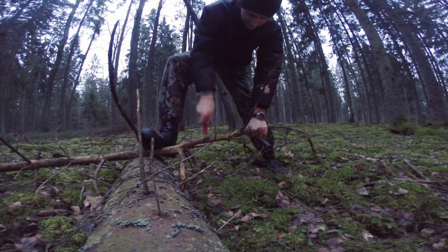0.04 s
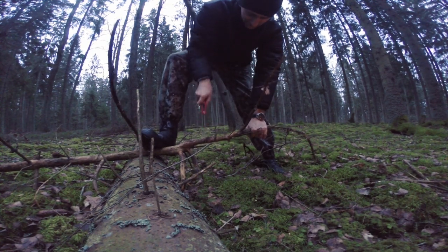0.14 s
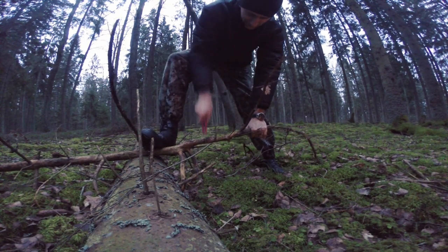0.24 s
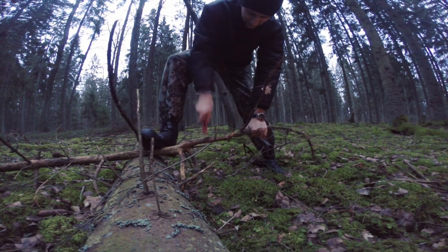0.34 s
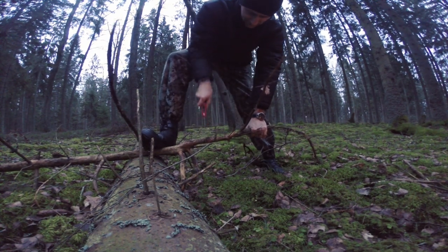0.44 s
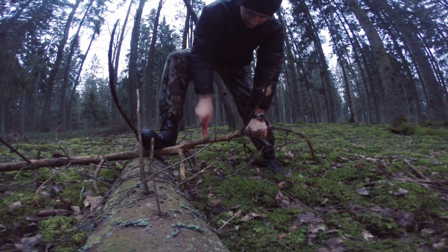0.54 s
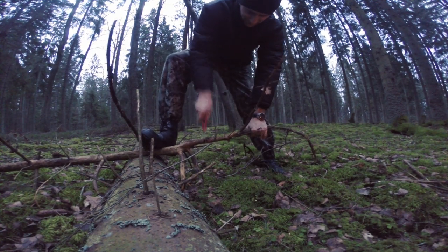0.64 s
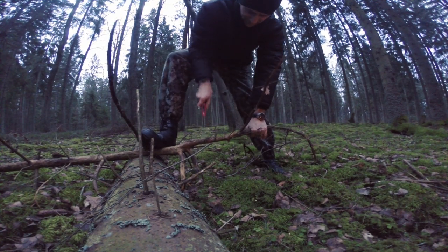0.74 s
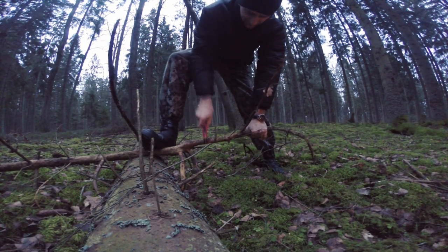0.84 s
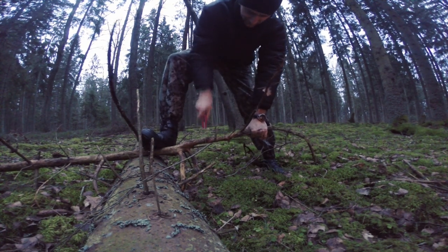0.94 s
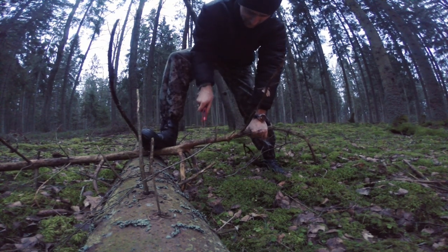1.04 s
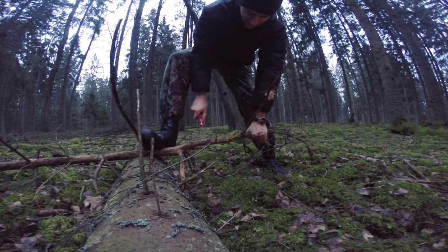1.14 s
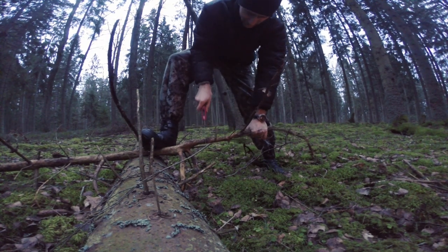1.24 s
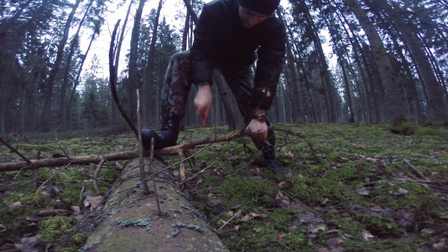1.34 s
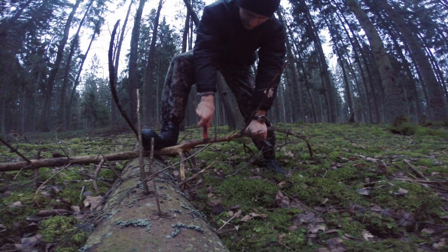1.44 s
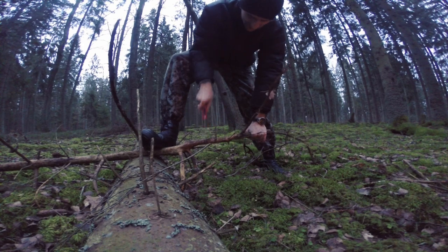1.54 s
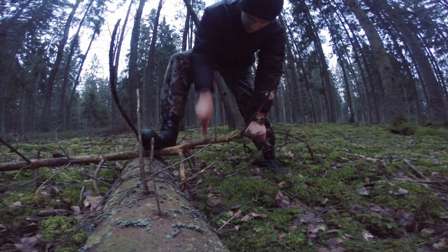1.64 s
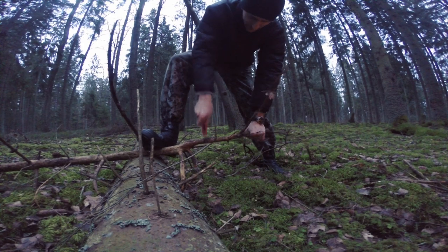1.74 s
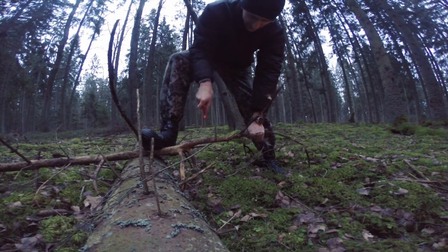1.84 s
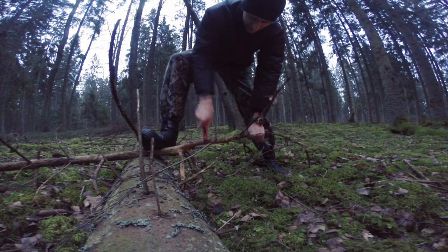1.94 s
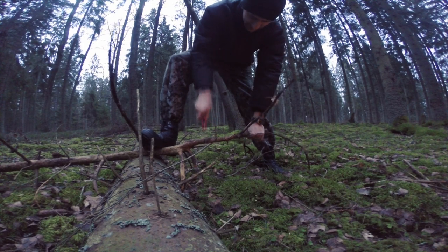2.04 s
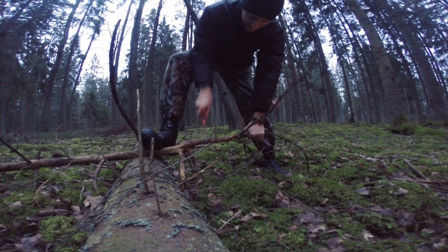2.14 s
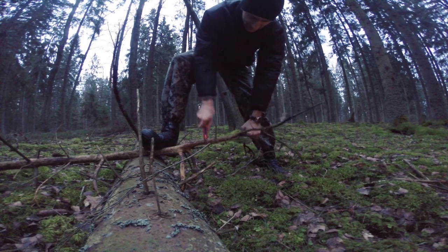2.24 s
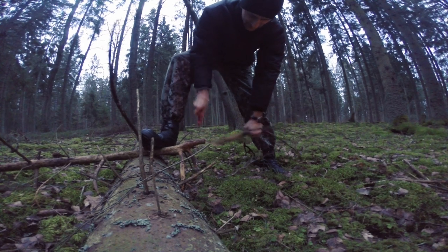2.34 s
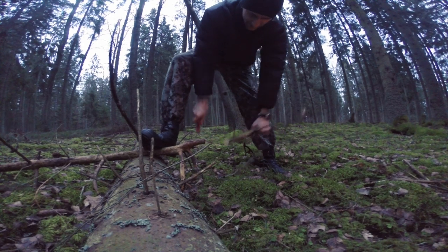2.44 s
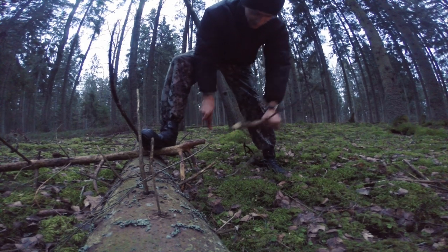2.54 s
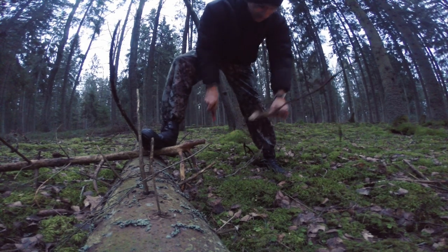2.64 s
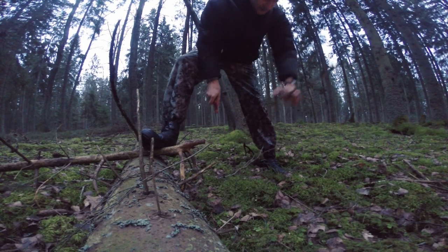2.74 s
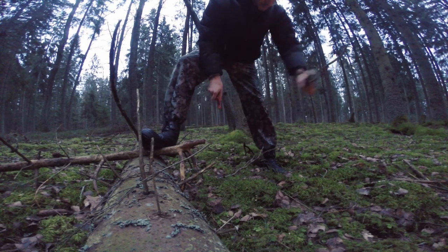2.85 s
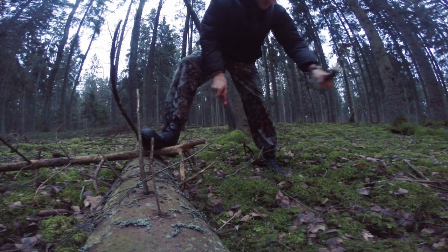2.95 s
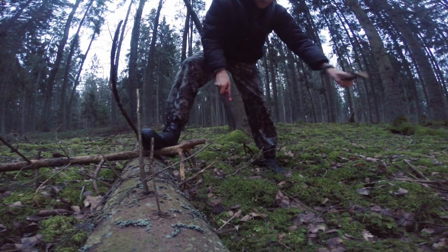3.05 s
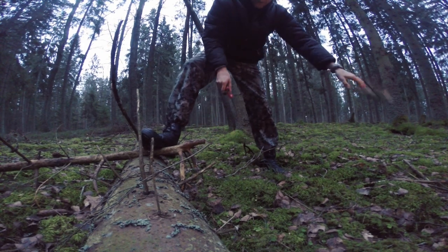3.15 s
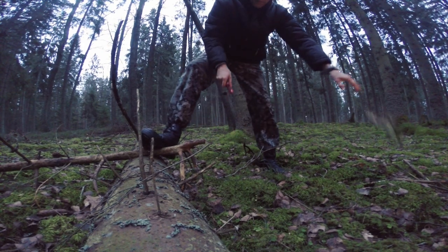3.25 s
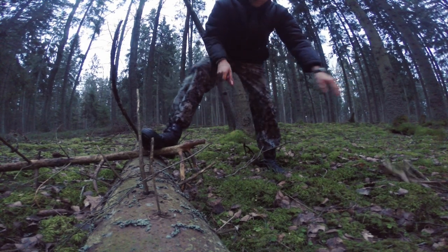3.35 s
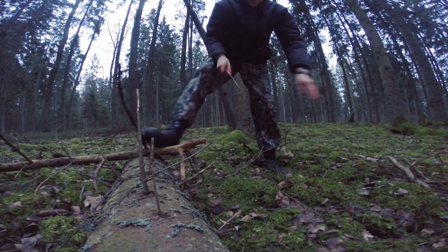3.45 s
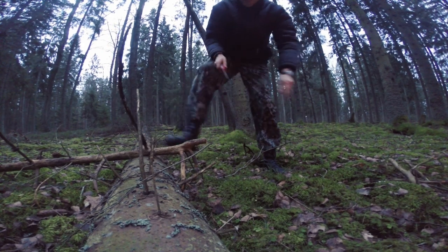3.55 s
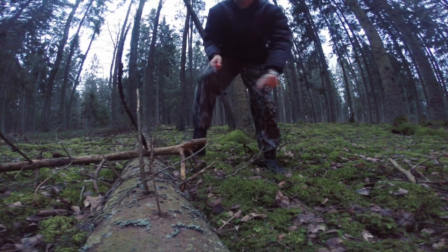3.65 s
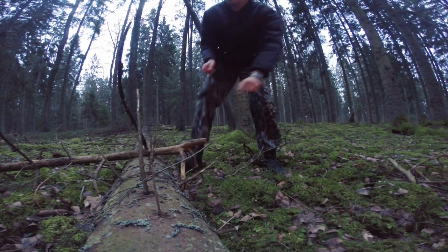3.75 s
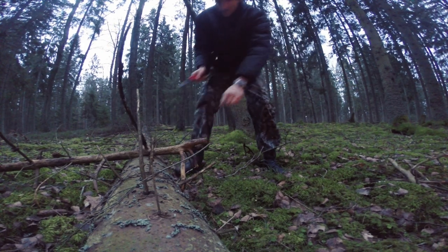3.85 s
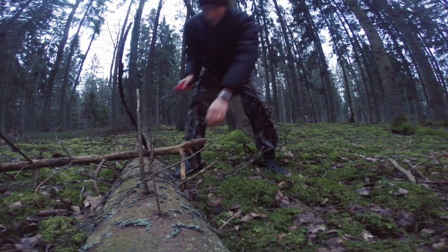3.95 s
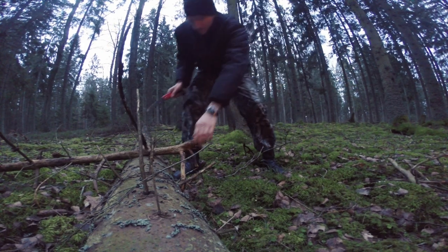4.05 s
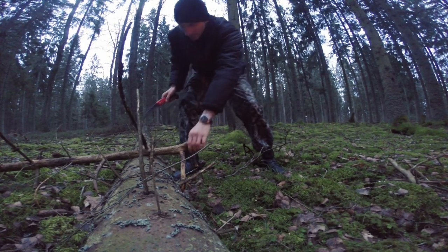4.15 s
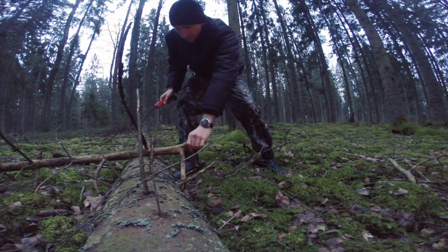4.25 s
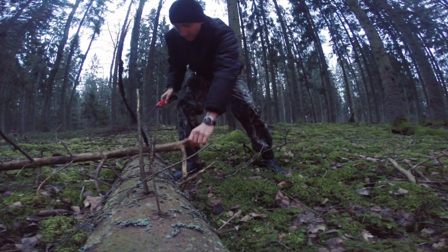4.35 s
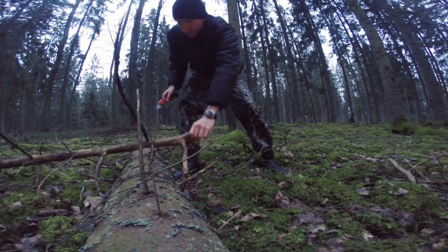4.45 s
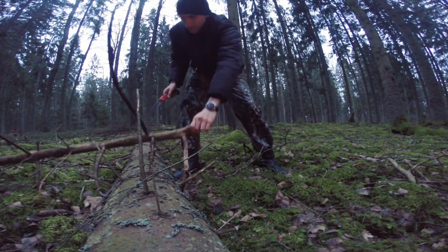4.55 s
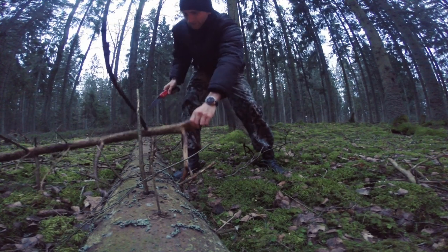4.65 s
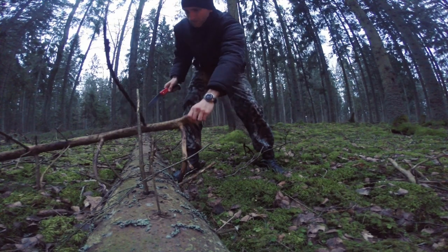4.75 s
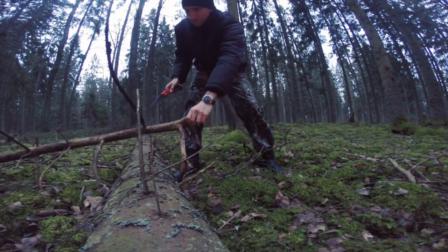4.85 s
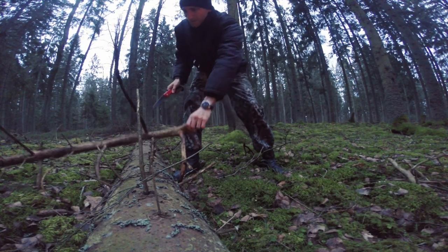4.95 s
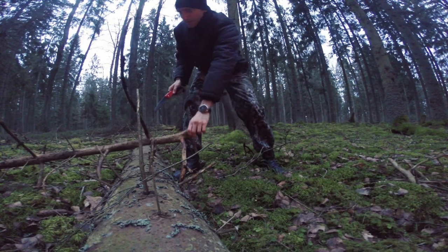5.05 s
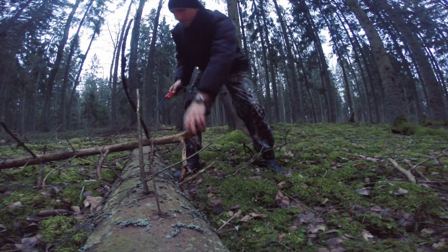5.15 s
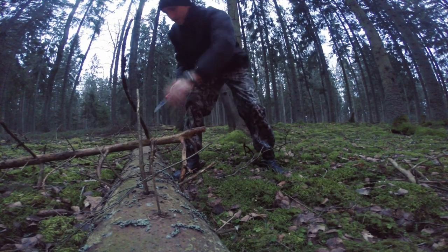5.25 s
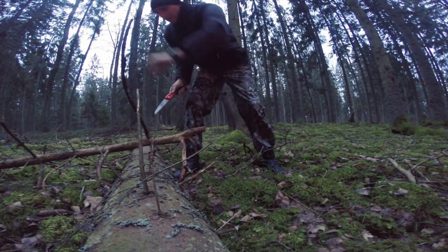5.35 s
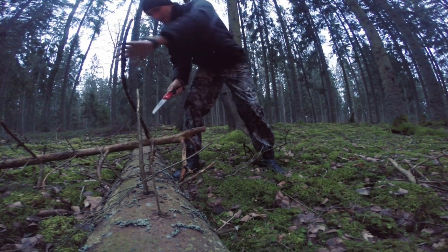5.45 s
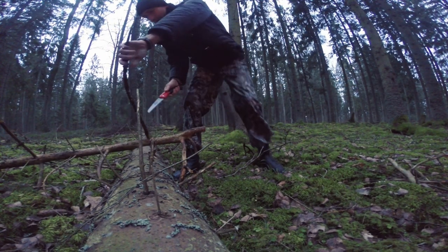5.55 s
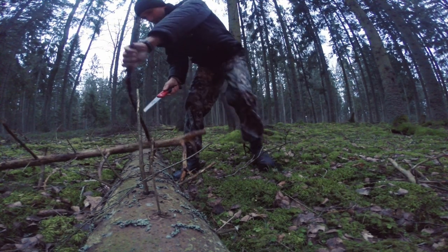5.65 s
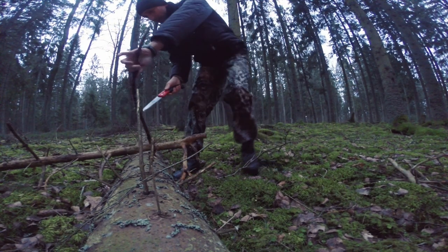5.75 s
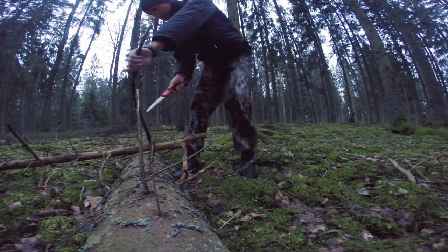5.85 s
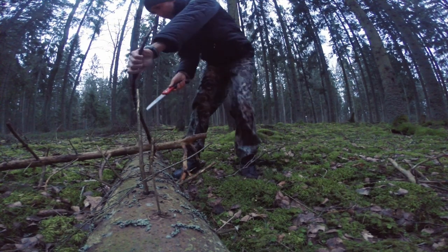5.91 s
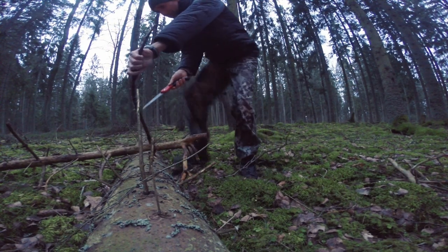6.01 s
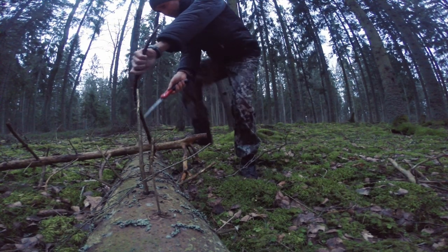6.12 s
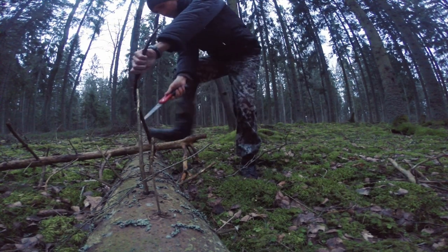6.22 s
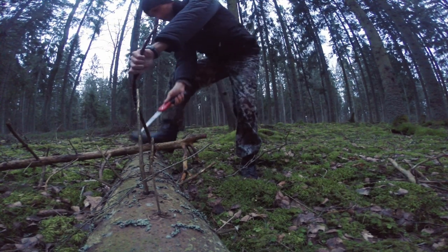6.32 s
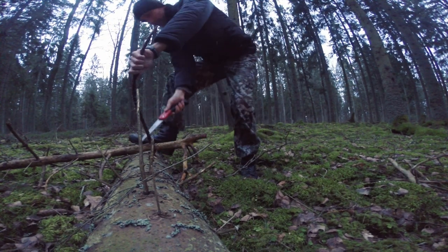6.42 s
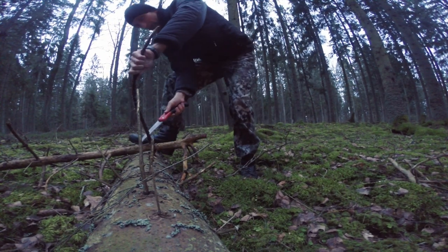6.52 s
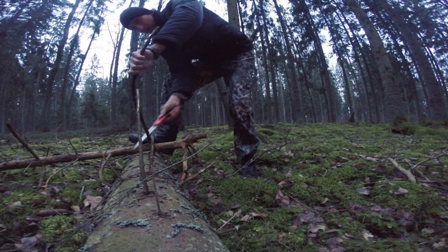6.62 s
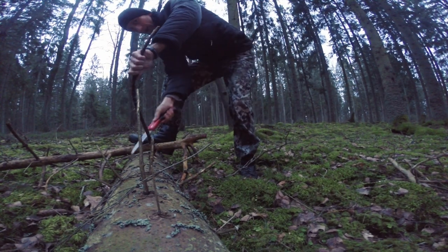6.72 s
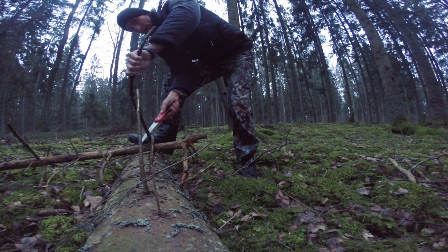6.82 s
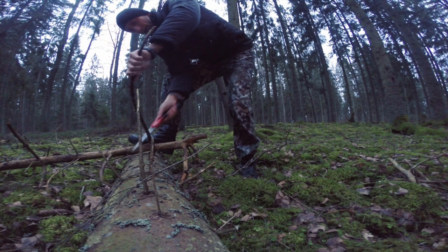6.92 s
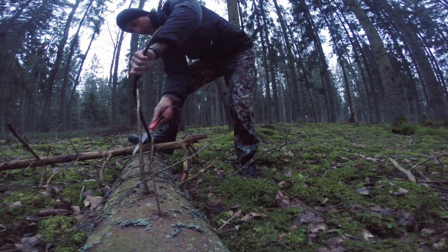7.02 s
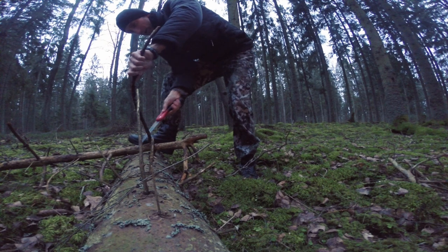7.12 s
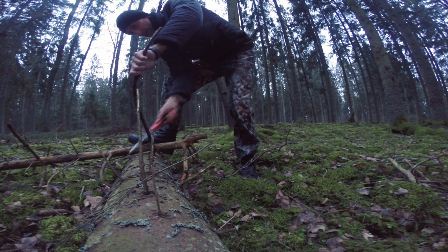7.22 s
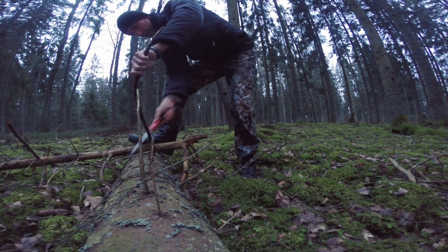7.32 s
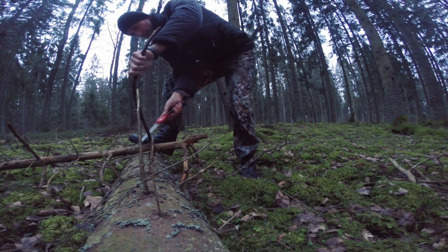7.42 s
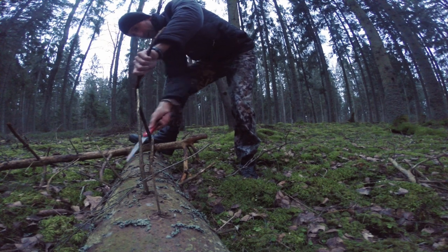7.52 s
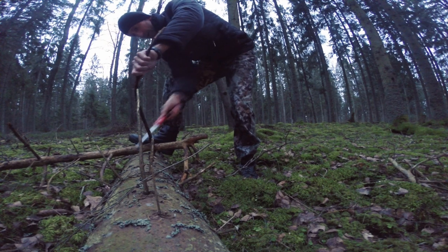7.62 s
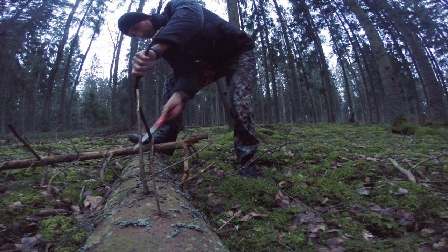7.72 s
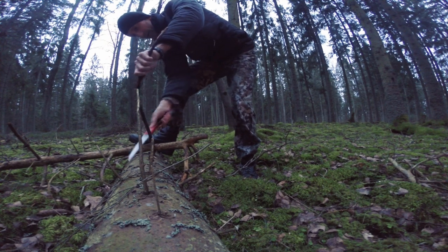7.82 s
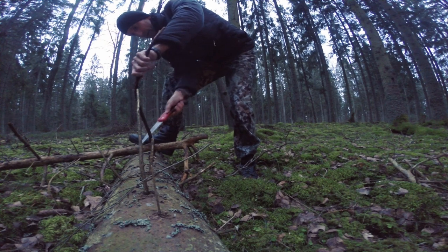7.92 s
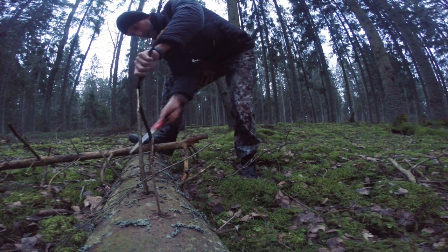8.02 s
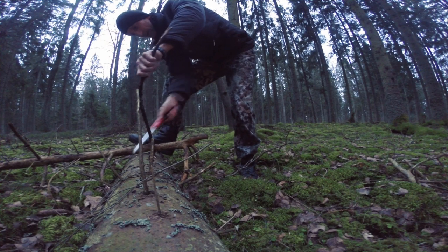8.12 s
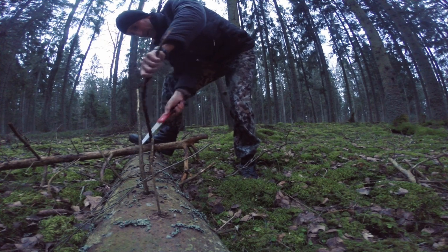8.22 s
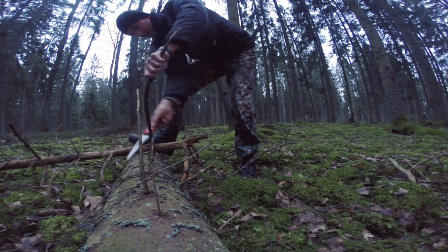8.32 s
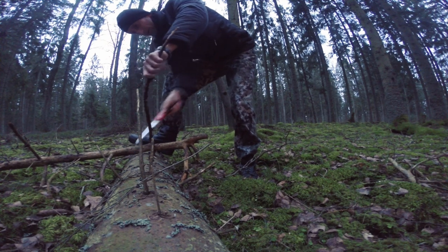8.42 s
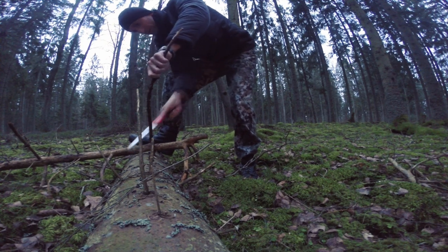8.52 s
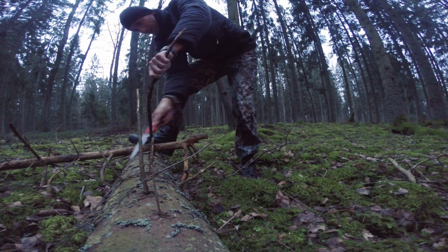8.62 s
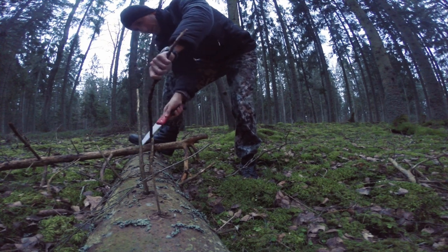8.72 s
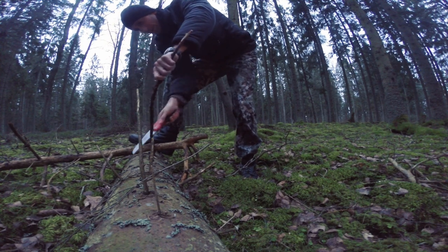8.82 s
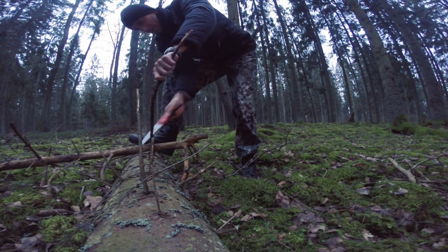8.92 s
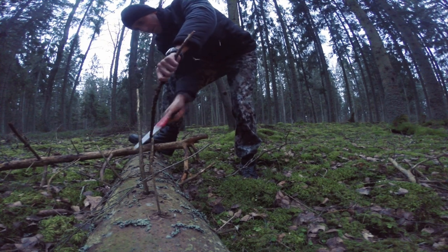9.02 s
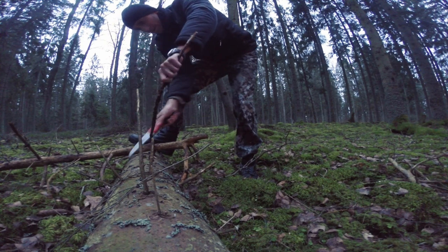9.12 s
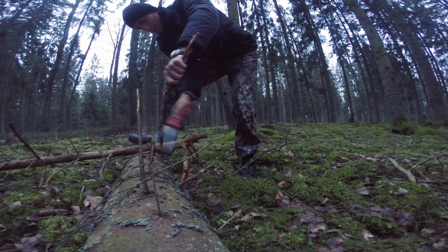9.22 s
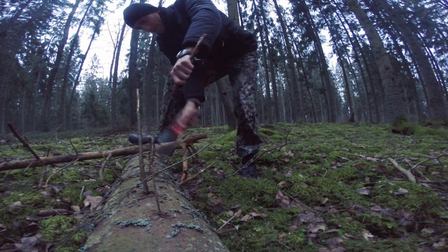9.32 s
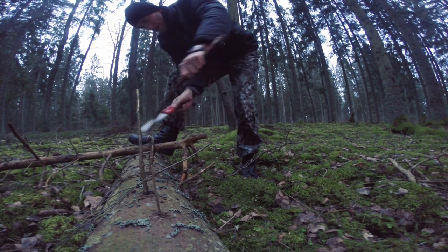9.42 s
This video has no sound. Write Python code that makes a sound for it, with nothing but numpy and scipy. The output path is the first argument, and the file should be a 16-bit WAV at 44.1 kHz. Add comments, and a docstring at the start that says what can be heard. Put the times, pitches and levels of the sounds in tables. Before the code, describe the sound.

Rapid dry sawing, alternating coarse bite and lighter skitter, resonates in wood very near the microphone. It ends with sharp snaps and crunching litter. A calmer gap holds small twig clicks, cloth and boot rustle and a bright wood knock or two. A second, somewhat quieter and brighter sawing follows to the end. Outdoor air is still and nearly dry, with steady hiss and faint high whine.

```python
"""A hand saw rasps through a dry spruce branch, close up over quiet forest air and a faint electronic whine.
Teeth mostly bite evenly on the pull and skitter on the push: tooth strikes and torn-fibre clicks drive
resonant wood. Twigs snap as bursts of noise, boots rustle as filtered crackle, and struck wood rings
as decaying sines; then the saw cuts a second branch."""
import sys
import numpy as np
from scipy import signal
from scipy.io import wavfile
from scipy.ndimage import uniform_filter1d

SR = 44100
rng = np.random.default_rng(int(sys.argv[2]) if len(sys.argv) > 2 else 0)


def generate_wav(signal):
    """Clip the signal to [-1, 1] and save it as 16-bit WAV at the path in sys.argv[1]."""
    frames = np.transpose(np.atleast_2d(signal))
    scaled = np.clip(frames, -1, 1) * 32767
    pcm = np.round(scaled).astype(np.int16)
    wavfile.write(sys.argv[1], SR, pcm)


N = 417627


def gain_of(db):
    """Turns decibels into an amplitude factor."""
    return 10 ** (np.asarray(db) / 20)


def evened(x):
    """Scales a signal to rms 1."""
    return x / np.sqrt(np.mean(x ** 2) + 1e-20)


def drift(samples):
    """Slow random wander of rms 1: noise averaged over this many samples."""
    return evened(uniform_filter1d(rng.standard_normal(N), samples))


def filtered(x, order, edges_hz):
    """Band-passes a signal, as a material that passes only part of the spectrum."""
    return signal.lfilter(*signal.butter(order, edges_hz, "band", fs=SR), x)


def add(mix, s, sound):
    """Lays a sound into the mix at s seconds, cut off at the end."""
    part = mix[round(s * SR):][:len(sound)]
    part += sound[:len(part)]


def body(points, rings=()):
    """Minimum-phase response of energy 1: a spectrum curve with resonant peaks on it."""
    size = 2 ** 13
    hz = abs(np.fft.fftfreq(size, 1 / SR))
    point_hz, point_db = np.transpose(points)
    level_db = np.interp(np.log(hz + 1), np.log(point_hz), point_db, left=-80, right=-80)
    for mid_hz, width_hz, lift_db in rings:
        level_db = level_db + lift_db / (1 + (2 * (hz - mid_hz) / width_hz) ** 2)
    log_gain = np.log(gain_of(np.maximum(level_db, -80)))
    # the Hilbert transform gives the phase that makes the response causal
    phase = signal.hilbert(log_gain).imag
    taps = np.fft.ifft(np.exp(log_gain - 1j * phase)).real[:size // 2]
    return taps / np.linalg.norm(taps)


def through(x, taps):
    """Sends a sound through a response."""
    return signal.oaconvolve(x, taps)[:N]


def grit(per_s, spread_db):
    """Random clicks of either sign, a few of them large, at rms 1."""
    size_db = spread_db * np.minimum(rng.exponential(1, N), 5)
    clicks = gain_of(size_db) * rng.choice([-1., 1.], N)
    return evened(clicks * (rng.random(N) < per_s / SR))


def peaked(t, first_s, hold_s, first_db, last_db, up_db_per_s, down_db_per_s, belly_db=0):
    """dB of the loudest event at each moment: climb, glide from first to last level with a bulge, drop."""
    loudest_db = np.full(len(t), -120.)
    events = np.broadcast(first_s, hold_s, first_db, last_db, up_db_per_s, down_db_per_s, belly_db)
    for s, hold, first, last, up, down, belly in events:
        progress = np.clip((t - s) / (hold + 1e-6), 0, 1)
        # the bulge lowers both ends by half of what it adds across the middle
        event_db = first + (last - first) * progress + belly * (np.sin(np.pi * progress) - .5)
        event_db = event_db - up * np.maximum(s - t, 0) - down * np.maximum(t - s - hold, 0)
        loudest_db = np.maximum(loudest_db, event_db)
    return loudest_db


def patchy(x, db):
    """Lifts and lowers random patches some 20 ms long and 500 Hz wide, less so in the lows."""
    hz, _, spectrum = signal.stft(x, SR, nperseg=512, noverlap=384)
    field = rng.standard_normal(spectrum.shape[::-1])
    field = uniform_filter1d(field, size=8, axis=0)
    field = evened(uniform_filter1d(field, size=6, axis=1))
    change_db = db * (field * np.clip(hz / 1200, 0, 1)).T
    return signal.istft(spectrum * gain_of(change_db), nperseg=512, noverlap=384)[1][:N]


# Spectrum of the steady hiss, relative levels: [pitch_hz, level_db]
AIR_COLOUR = [(20, 0), (110, 3), (400, -8.5), (1000, -13), (2700, -20.5), (4500, -23.5), (5600, -24),
              (6500, -25), (8000, -34.5), (12000, -27), (14500, -39), (16000, -63)]
# A fuzzy band in the hiss: [pitch_hz, width_hz, lift_db]
AIR_BAND = [(5625, 120, 12.5)]
# Level curve of the low shaking carried along the log: [time_s, level_db]
LOG_SHAKING = [(0.0, -64), (0.13, -54), (2.61, -50), (2.95, -65.5), (6.2, -62), (6.38, -74.5),
               (6.49, -45.5), (6.62, -62), (8.47, -50.5), (8.68, -56), (9.39, -47), (9.47, -59)]
AIR_DB = -56


def forest():
    """Steady air and hiss as coloured noise, over 14-36 Hz noise for the shaking log."""
    air = gain_of(AIR_DB) * through(rng.standard_normal(N), body(AIR_COLOUR, AIR_BAND))
    low_band = signal.butter(2, [14, 36], "band", fs=SR, output="sos")
    low = evened(signal.sosfilt(low_band, rng.standard_normal(N)))
    shaking_s, shaking_db = np.transpose(LOG_SHAKING)
    return air + gain_of(np.interp(np.arange(N) / SR, shaking_s, shaking_db)) * low


# Harmonics of the electronic whine: [harmonic, level_db rms]
WHINE_HARMONICS = [(1, -78), (2, -68), (3, -81), (4, -72.5), (5, -89)]
FRAME_HZ, WHINE_TURNS_PER_FRAME = 30000 / 1001, 97.645
BLANK_S = .001  # the fade on either side of each restart


def whine():
    """A thin electronic tone with harmonics, dipping out and restarting some thirty times a second."""
    frame = FRAME_HZ * np.arange(N) / SR % 1
    gate = np.clip(np.minimum(frame, 1 - frame) / (FRAME_HZ * BLANK_S), 0, 1)
    tone = np.zeros(N)
    for harmonic, db in WHINE_HARMONICS:
        turns = harmonic * WHINE_TURNS_PER_FRAME * frame + rng.random()
        tone += gain_of(db) * np.sqrt(2) * np.sin(2 * np.pi * turns)
    return gate * tone


# Spectrum of scuffed moss, relative levels: [pitch_hz, level_db]
SCUFF_COLOUR = [(88, -42), (150, -4.5), (519, 0), (576, -5), (966, 2.5), (1520, -13), (1940, -6.5),
                (2580, -13.5), (3300, -8), (4290, -38), (7260, -120)]
# Spectrum of dry leaves, relative levels: [pitch_hz, level_db]
LEAF_COLOUR = [(1530, -42), (2600, -15.5), (2970, 12), (4410, 7.5), (5570, 3), (6890, 0), (9520, -12.5),
               (12100, -11), (15000, -45)]
# One row a movement: [loudest_s, swell_s, fade_s, scuff_db, leaf_db]
MOVEMENTS = [(2.383, 0.015, 0.055, -31, -39.5), (2.443, 0.058, 0.036, -37, -42),
             (2.505, 0.053, 0.1, -47, -51), (2.6, .15, 0.32, -58.5, -60.5),
             (3.464, 0.031, 0.084, -44.5, -45), (3.87, .05, 0.42, -52, -57.5),
             (3.975, 0.16, 0.12, -49.5, -54), (4.04, .2, 0.27, -54.5, -59.5), (4.488, 0.023, .06, -55, -66),
             (4.728, 0.072, 0.12, -48, -60), (4.81, 0.08, 0.28, -53.5, -62), (5.7, .08, 0.43, -58, -62),
             (5.94, 0.37, 0.09, -51, -56.5), (5.984, 0.066, 0.087, -41.5, -47),
             (6.07, 0.045, 0.74, -58, -61), (6.19, 0.0068, 0.027, -50, -44.5),
             (6.474, 0.028, 0.04, -38, -52.5), (6.69, 0.064, .04, -58, -64)]
MOVE_RANGE_DB = 27  # what a swell gains and a fade loses
STIR_DB, STIR_LEAF_DB = -64.5, -77  # the faint stir under and between movements
SWISH_DB = -4.5  # smooth cloth swish among the crackles


def rustle():
    """Boots, sleeves and twigs drag through moss and dry leaves: crackle and swish in two colours."""
    t = np.arange(N) / SR
    s, swell_s, fade_s, scuff_db, leaf_db = np.transpose(MOVEMENTS)
    slopes = MOVE_RANGE_DB / swell_s, MOVE_RANGE_DB / fade_s
    scuff = gain_of(peaked(t, s, 0, scuff_db, scuff_db, *slopes)) + gain_of(STIR_DB)
    leaf = gain_of(peaked(t, s, 0, leaf_db, leaf_db, *slopes)) + gain_of(STIR_LEAF_DB)
    swish = gain_of(SWISH_DB) * rng.standard_normal(N)
    friction = patchy(evened(grit(2500, 5.2) + swish), 2.6)
    return scuff * through(friction, body(SCUFF_COLOUR)) + leaf * through(friction, body(LEAF_COLOUR))


def resonate(x, hz, width_hz):
    """One resonance: a two-pole ring whose damping sets its width."""
    r = np.exp(-np.pi * width_hz / SR)
    return signal.lfilter([1, 0, -1], [1, -2 * r * np.cos(2 * np.pi * hz / SR), r * r], x)


def blade(strokes):
    """Tooth pairs passed, evenness, buzz and fizz: blade speed arches over each stroke."""
    t = np.arange(N) / SR
    columns = np.transpose(strokes)
    # each stroke hands over halfway between its release and the next bite
    turns_s = (columns[0, 1:] + (columns[0] + columns[1])[:-1]) / 2
    now = columns[:, np.searchsorted(turns_s, t)]
    fizz_db, _, top_s, pairs_hz, half_s, even, buzz_db = now[4:]
    speed = np.clip(1 - .5 * ((t - top_s) / half_s) ** 2, .25, 1)
    wobble = .012 * drift(500)
    pairs = np.cumsum(pairs_hz * speed * (1 + wobble)) / SR
    return pairs, np.clip(even, 0, 1), buzz_db, fizz_db


BITE_DB_PER_S, LIFT_DB_PER_S = 718, 684  # how fast a stroke climbs to its hold and drops after it
BELLY_DB, EVEN_BELLY_DB = 0.5, 4  # bulge in the hold, and how much more a fully even bite bulges
FLEX_AT, FLEX_DB_PER_S = 0.69, 160  # the branch bends most this far through the hold
THINS_DB_PER_S = 2.5  # the lows lighten as the cut deepens
PATCHY_DB = 2.5  # the upper colour shifts as the contact moves along blade and branch


def cut(strokes, wood, fizz, flex, orders, lean, soft_hz, weight_db):
    """Left-set and right-set teeth strike unequally; fibres tear in clumps, the blade sings, the branch bends."""
    t = np.arange(N) / SR
    s, hold_s, first_db, last_db, _, bend_db, *_, stroke_even, _ = np.transpose(strokes)
    level_db = peaked(t, s, hold_s, first_db, last_db, BITE_DB_PER_S, LIFT_DB_PER_S,
                      BELLY_DB + EVEN_BELLY_DB * stroke_even)
    flex_db = peaked(t, s + FLEX_AT * hold_s, 0, bend_db, bend_db, FLEX_DB_PER_S, FLEX_DB_PER_S)
    pairs, even, buzz_db, fizz_db = blade(strokes)

    # one pulse a tooth, alternately stronger and weaker
    tooth = np.floor(2 * pairs)
    uneven_set = 1 + lean * (-1) ** tooth
    strike = np.diff(tooth, prepend=0) * uneven_set * gain_of(0.92 * rng.standard_normal(N))
    strike = strike / np.sqrt(uniform_filter1d(strike ** 2, 2000) + 1e-9)

    # on uneven strokes the blade chatters: it grabs, then lets go, some fifty times a second
    clump = gain_of(0.62 * drift(400))
    grabs = np.cumsum(52 * (1 + .35 * drift(1500))) / SR
    clump = clump * gain_of(-11.0 * (1 - even) * (grabs % 1 - .5))
    torn = evened(clump * grit(1500, 2.0))

    # the even part of the bite is blunt: well above soft_hz mostly torn fibres sound
    blunt = signal.butter(2, soft_hz, fs=SR)
    dull = signal.filtfilt(*blunt, torn)
    bite = np.sqrt(even) * signal.filtfilt(*blunt, strike) + (1 - even) * dull + torn - dull
    lows = signal.filtfilt(*signal.butter(2, 600, fs=SR), bite)
    lows_db = weight_db - THINS_DB_PER_S * np.clip(t - s[0], 0, s[-1] - s[0])
    bite += (gain_of(lows_db) - 1) * lows

    # the blade sings at multiples of the tooth-pair rate
    song = sum(gain_of(db) * np.sin(2 * np.pi * k * pairs + k * k) for k, db in orders)
    buzz = gain_of(buzz_db) * song

    # sawdust clicks gather just after each tooth when the bite is even
    after_tooth = np.exp(-(2 * pairs % 1) / 0.93)
    chips = evened(clump * (.5 + even * after_tooth) * grit(9000, 3.65))
    bend = evened(resonate(resonate(rng.standard_normal(N), *flex), *flex))
    press = gain_of(uniform_filter1d(level_db, size=300))
    sound = through(press * (bite + buzz), wood) + through(press * gain_of(fizz_db) * chips, fizz)
    return patchy(sound, PATCHY_DB) + gain_of(uniform_filter1d(flex_db, 800)) * bend


# One row a saw stroke, both branches; bite levels are before the bulge, fizz is relative to the bite:
# [bite_s, hold_s, first_db, last_db, fizz_db, flex_db, top_speed_s, tooth_pairs_hz at top speed,
#  half_s from top to half speed, evenness 0-1, buzz_db]
SAW_STROKES = [ (.035, 0.061, -20.5, -26.5, -16, -37, .065, 243, 0.044, 0.33, -1),
               (.172, 0.079, -28.5, -26.5, -10, -32.5, .23, 132, 0.034, 0.15, -6),
               (.315, 0.063, -21.5, -21, -23, -51, .355, 240, 0.049, 0.76, -3.5),
               (.46, 0.067, -28.5, -26, -7, -30.5, .509, 237, 0.095, 0, -27),
               (.612, .07, -20, -27, -18, -38, .643, 210, 0.042, .56, -2),
               (.75, 0.071, -28.5, -25, -8, -29.5, .751, 246, .088, 0, -23),
               (.896, 0.072, -23.5, -25, -16.5, -44, .938, 223, .051, 0.32, -2.5),
               (1.04, 0.072, -26.5, -28, -16.5, -41, 1.065, 190, 0.068, 0.35, -9),
               (1.185, 0.011, -27.5, -32.5, -14.5, -48, 1.21, 220, .048, 0, -4.5),
               (1.33, .04, -44, -40.5, -7.5, -55, 1.31, 217, 0.084, 0.06, -19),
               (1.457, 0.068, -28, -26, -17.5, -64, 1.475, 173, 0.079, 0.11, -6.5),
               (1.605, 0.061, -22, -26, -15, -39.5, 1.653, 250, 0.061, 0.24, -17),
               (1.727, 0.059, -21.5, -22.5, -20.5, -57, 1.778, 234, 0.068, 0.43, -7.5),
               (1.872, 0.079, -21.5, -29, -12.5, -33.5, 1.9, 263, .082, 0.01, -24),
               (2.009, 0.058, -23, -23.5, -14, -54, 2.041, 220, 0.086, 0.23, -5.5),
               (2.145, 0.061, -24.5, -26.5, -12.5, -34.5, 2.161, 160, 0.086, 0.18, -10),
               (2.28, 0.05, -18, -22.5, -16.5, -44, 2.337, 216, 0.085, 0.67, -5.5),
               (6.71, 0.071, -40, -36, -12.5, -65, 6.726, 217, .1, 0.36, -9),
               (6.858, 0.069, -35.5, -32.5, -9.5, -45, 6.889, 137, 0.1, 0.2, -22),
               (7.015, 0.063, -32, -32.5, -15, -49, 7.038, 170, 0.08, 0.07, -27),
               (7.144, 0.085, -39, -28.5, -9.5, -43.5, 7.228, 202, 0.042, 0.27, -33),
               (7.306, 0.063, -22.5, -29, -19.5, -66, 7.336, 185, .053, 0.67, -6.5),
               (7.432, 0.075, -31.5, -29, -11, -39, 7.469, 264, .062, 0.06, -11),
               (7.565, 0.06, -24.5, -25.5, -17.5, -59, 7.609, 196, 0.053, 0.6, -8.5),
               (7.685, 0.087, -31, -31, -7.5, -36, 7.732, 232, .079, 0.03, -33),
               (7.829, .075, -26.5, -24.5, -16.5, -59, 7.88, 212, .065, 0.44, 0.5),
               (7.952, 0.079, -29.5, -26.5, -10, -43, 8.02, 223, 0.083, 0, -10),
               (8.1, 0.063, -26, -25, -16.5, -58, 8.134, 178, 0.044, .55, -4.5),
               (8.225, 0.068, -27.5, -23, -9.5, -37.5, 8.264, 171, 0.059, 0.16, -9.5),
               (8.346, 0.077, -27, -18.5, -17.5, -58, 8.414, 200, 0.077, 0.55, -7),
               (8.5, 0.053, -28, -25, -12, -41, 8.523, 244, 0.091, 0, -21),
               (8.615, .069, -20.5, -21, -22.5, -52, 8.664, 206, 0.099, 0.46, -14),
               (8.759, 0.073, -29, -39, -4, -45, 8.76, 180, 0.096, 0, -10),
               (8.868, 0.063, -41, -27, -10.5, -58, 8.914, 235, 0.064, 0.15, -8),
               (8.992, 0.058, -37, -26.5, -8, -47, 9.034, 193, 0.056, 0.1, -21),
               (9.111, 0.078, -27, -21.5, -18.5, -56, 9.163, 174, .05, .66, -8),
               (9.258, 0.064, -27.5, -29, -10, -56, 9.284, 198, .061, 0.42, -18),
               (9.382, 0.0075, -37, -28.5, -12.5, -43, 9.42, 104, .037, 0.3, 1.5)]
FIRST_BRANCH_STROKES = 17
# First branch's wood spectrum, relative levels: [pitch_hz, level_db]
FIRST_WOOD_COLOUR = [(76, -51), (130, -10.5), (206, -7.5), (464, 0), (776, -5), (864, 0.5), (1310, -6.5),
                     (1890, -8.5), (2840, -20), (3300, -24), (4290, -59), (7260, -120)]
# First branch's wood resonances: [pitch_hz, width_hz, lift_db]
FIRST_WOOD_RINGS = [(655, 60, 7), (851, 70, 5), (1105, 73, 7.5), (1450, 90, 6), (1895, 70, 4)]
# First branch's sawdust spectrum, relative levels: [pitch_hz, level_db]
FIRST_DUST_COLOUR = [(1650, 3), (2800, -3), (4150, 7.5), (4770, -1), (5480, -10), (7890, -11.5),
                     (10700, -18), (12000, -22), (15200, -32), (16000, -49)]
# First branch's sawdust resonances: [pitch_hz, width_hz, lift_db]
FIRST_DUST_RINGS = [(3386, 190, 8.5), (3720, 200, -2.5)]
# Bending of the whole first branch: pitch_hz, width_hz
FIRST_BEND = (76, 26)
# Blade song in the first branch: [multiple of the tooth-pair rate, level_db]
FIRST_SONG = [(2, -8), (3, -21.5), (4, -13), (5, -18)]


def first_branch():
    """The first cut: teeth excite the first branch's wood and sawdust colours."""
    wood = body(FIRST_WOOD_COLOUR, FIRST_WOOD_RINGS)
    fizz = body(FIRST_DUST_COLOUR, FIRST_DUST_RINGS)
    strokes = SAW_STROKES[:FIRST_BRANCH_STROKES]
    return cut(strokes, wood, fizz, FIRST_BEND, FIRST_SONG, lean=0.3, soft_hz=1630, weight_db=4.5)


# Twig snaps and tooth catches; thump and treble are relative to the crack, treble dies in 0.6 of t60:
# [start_s, crack_db, thump_db, treble_db, t60_s]
TWIG_SNAPS = [(0.046, -24.5, 8.5, -28, 0.014), (0.425, -25, -3, -22, 0.015), (0.5, -19, -14, -6, 0.014),
              (0.7222, -26.5, -16, -26, 0.024), (.753, -22.5, -18, 2.5, 0.021),
              (1.011, -22.5, -7, -28, 0.014), (1.238, -36, -7, 6, 0.013), (1.3181, -23, -36, -41, 0.013),
              (1.7934, -11.5, -6, -7, 0.032), (1.8691, -4.5, -17, -12, 0.025), (2.123, -27, -3, -22, 0.015),
              (2.2826, 4.5, -21, -16, 0.014), (2.304, -10, -5, -2, 0.01), (2.4262, -8.5, -35, 9.5, 0.017),
              (2.713, -38.5, -19, -17, 0.014), (2.9225, -34.5, -8, 6.5, 0.011), (2.99, -36.5, -21, 2, 0.01),
              (3.334, -37.5, -5, 2.5, 0.012), (3.46, -38, -25, 6, 0.015), (3.5155, -39, -13, 3, 0.017),
              (3.5384, -26, -9.5, -1.5, 0.027), (4.111, -45, -8, -9, 0.015),
              (5.026, -28.5, -14, 6.5, 0.007), (5.0343, -29.5, -23, 6, 0.012),
              (5.9783, -44, -10, -25, 0.015), (6.047, -13, -14, 8, 0.0069), (6.123, -35.5, -6, 3, 0.012),
              (6.1883, -32, -7, -3, 0.011), (7.6173, -4, -52, -47, 0.0047),
              (7.6346, -15.5, -3.5, -26, 0.028), (8.4714, -24.5, -5, -25, 0.027),
              (8.6847, -15, -17, -26, 0.017), (8.8683, -16.5, -17, 4, 0.011),
              (9.3726, -23.5, -12, -32, 0.018), (9.4184, -29.5, -6, 6, 0.013),
              (9.4596, -23, -12, -11, 0.035)]


def snaps():
    """Fibres part in a sharp pull, then noise dies within milliseconds in three bands, treble fastest."""
    out, t = np.zeros(N), np.arange(SR // 8) / SR
    for s, crack_db, thump_db, treble_db, t60_s in TWIG_SNAPS:
        burst = np.where(t == 0, 5.0, rng.standard_normal(len(t)))
        # the crack starts as a pull, the thump as a push
        parts = [([200, 800], thump_db, 1.0, 1), ([800, 2800], 0, 1.0, -1), ([3300, 9000], treble_db, .6, -1)]
        for edges_hz, lift_db, slow, sign in parts:
            ring = filtered(burst * gain_of(-60 * t / (slow * t60_s)), 2, edges_hz)
            add(out, s, sign * gain_of(crack_db + lift_db) * ring / abs(ring).max())
    return out


def trees(x):
    """A short scatter off log and trunks: sparse echoes of random sign, dying away."""
    t = np.arange(SR // 4) / SR
    echoes = rng.choice([-1., 1.], len(t)) * (rng.random(len(t)) < .05)
    taps = echoes * gain_of(-60 * t / 0.081) * (t > .003)
    return through(x, taps / np.linalg.norm(taps))


# The blade jams or a boot lands, one dull swing: [start_s, level_db, pitch_hz]
DULL_JOLTS = [(0.397, -16.5, 488), (1.7903, -9.5, 450), (2.0709, -8.5, 478), (2.326, -9.5, 449.5),
              (6.452, -31.5, 244), (9.379, -20, 261.4), (9.381, -33, 298)]


def jolts():
    """A heavily damped thud: about one and a half soft swings."""
    out = np.zeros(N)
    for s, db, hz in DULL_JOLTS:
        turns = np.arange(0, 1.6, hz / SR)
        add(out, s, gain_of(db) * np.sin(np.pi * turns / 1.6) * -np.cos(2 * np.pi * turns))
    return out


# Blows on dry wood; where it is hit sets what rings:
# [start_s, level_db, log_thump_db, low_modes_db, middle_mode_db, upper_modes_db, ring_time_factor]
WOOD_KNOCKS = [(2.385, -23, -25.5, -15, -2, -4, .5), (2.486, -37, -30, 2, -10, -4, 0.44),
               (2.502, -30, -29, 5.5, -14, -27, 0.2), (3.487, -35, -22, 3, -1, 7, 0.46),
               (3.962, -34, -28, -13, 0, 9, 0.55), (4.155, -7, -37, -5, 2.5, 8, 0.74),
               (4.489, -46, -20, -13, -7, 4, 0.56), (4.73, -35, -23, -6, -10, 3, 0.86),
               (4.777, -15, -24, -5, -29, 1.5, 1.05), (5.688, -40, -20, -13, 1, 4, 0.49),
               (5.814, -31, -9, 3, -1.5, 4.5, 0.47), (6.475, -30, -10, -1, -7, -1, 0.3),
               (6.529, -30, -14, 2, -18, 4, 0.56), (7.682, -18, -35, -17, 4, 6, 0.56),
               (7.906, -18, -27, -9, -3, 11, 0.46), (8.498, -23, -30, 13, 3, 10, 0.52)]
# Modes in four groups (thump, low, middle, upper), ring times before the factor above:
# [pitch_hz, level_db, t60_s]
WOOD_MODES = [
    [(130, 0, .3)],
    [(335, -12, .06), (780, 0, .08), (930, -5, .04)],
    [(1157, 0, .055)],
    [(1620, -9, .012), (2030, 0, .026), (2400, -8, .014), (3300, -18, .012), (4100, -17, .012),
     (5200, -22, .01), (7400, -26, .012)],
]
CRACK_DB, CRACK_T60_S = -14, 0.012  # splinter of noise at the start of a knock, relative to it


def knocks():
    """A rough contact of a few milliseconds rings the modes of dry wood."""
    out, t = np.zeros(N), np.arange(SR // 3) / SR
    for s, db, *shares_db, slow in WOOD_KNOCKS:
        ring = np.zeros(len(t))
        for share_db, modes in zip(shares_db, WOOD_MODES):
            for hz, mode_db, t60_s in modes:
                decay = gain_of(share_db + mode_db - 60 * t / (t60_s * slow))
                ring += decay * np.sin(2 * np.pi * hz * t)
        ring *= 1 - np.exp(-t / 8e-4)  # soft onset
        contact = rng.standard_normal(150)
        ring = ring + .025 * np.convolve(ring, contact)[:len(t)]
        splinter = filtered(rng.standard_normal(len(t)), 2, [2500, 7500])
        crack = splinter * gain_of(CRACK_DB - 60 * t / CRACK_T60_S)
        add(out, s, gain_of(db) * (ring / abs(ring).max() + crack))
    return out


# Second branch's wood spectrum, relative levels: [pitch_hz, level_db]
SECOND_WOOD_COLOUR = [(76, -35), (130, -12.5), (400, -2.5), (470, -5), (925, -8), (1030, 0), (1350, -17.5),
                      (1870, -14.5), (2420, -29.5), (3300, -21), (4290, -118), (7260, -120)]
# Second branch's wood resonances: [pitch_hz, width_hz, lift_db]
SECOND_WOOD_RINGS = [(213, 40, 6), (800, 90, 8), (1041, 60, 9), (1210, 80, 4), (1910, 530, 5.8),
                     (2140, 270, 8), (2470, 60, 2)]
# Second branch's sawdust spectrum, relative levels: [pitch_hz, level_db]
SECOND_DUST_COLOUR = [(1650, 7), (2800, 8), (3920, 5), (5600, 0.5), (6520, -2), (9460, -7), (10300, -4.5),
                      (11600, -13.5), (12800, -10), (15200, -22), (16000, -44)]
# Second branch's sawdust resonances: [pitch_hz, width_hz, lift_db]
SECOND_DUST_RINGS = [(3184, 140, 5.8), (4020, 560, 7.1), (6690, 280, 6.3), (8160, 190, 2.7)]
# Bending of the whole second branch: pitch_hz, width_hz
SECOND_BEND = (76, 55)
# Blade song in the second branch: [multiple of the tooth-pair rate, level_db]
SECOND_SONG = [(2, -7), (3, -18.5), (4, -25), (5, -34)]


def second_branch():
    """The second cut: the remaining strokes excite the second branch's own colours."""
    wood = body(SECOND_WOOD_COLOUR, SECOND_WOOD_RINGS)
    fizz = body(SECOND_DUST_COLOUR, SECOND_DUST_RINGS)
    strokes = SAW_STROKES[FIRST_BRANCH_STROKES:]
    return cut(strokes, wood, fizz, SECOND_BEND, SECOND_SONG, lean=0.18, soft_hz=1030, weight_db=4.0)


def scene():
    """Saw, hits and their faint scatter over the quiet floor."""
    floor = forest() + whine() + rustle()
    saw = first_branch() + second_branch()
    hits = snaps() + jolts() + knocks()
    return (floor + saw + hits + gain_of(-19) * trees(hits))[None]


def record(dry):
    """Soft overload rounds the loudest cracks, then a steep low-pass removes the extreme treble."""
    rounded = np.tanh(dry / .95) * .95
    edge = signal.firwin(511, 16400, window=("kaiser", 9), fs=SR)  # cutoff in Hz
    return signal.oaconvolve(rounded, edge[None], "same")


dry = scene()
out = record(dry)
generate_wav(out)
```